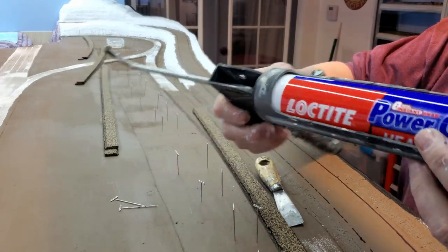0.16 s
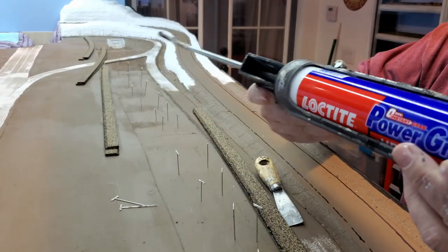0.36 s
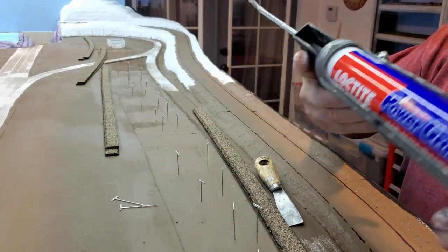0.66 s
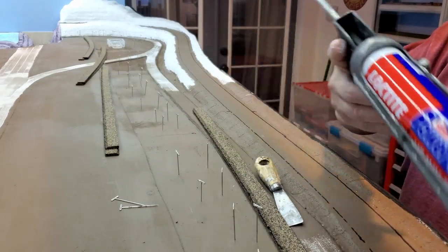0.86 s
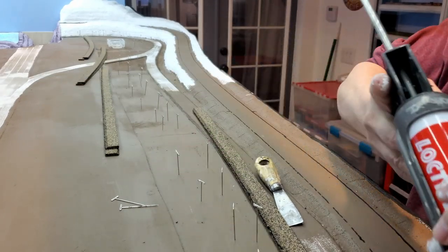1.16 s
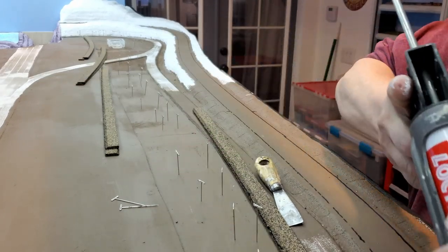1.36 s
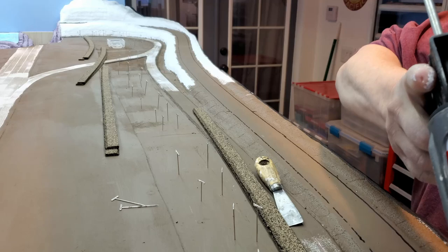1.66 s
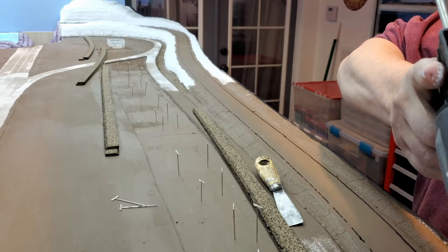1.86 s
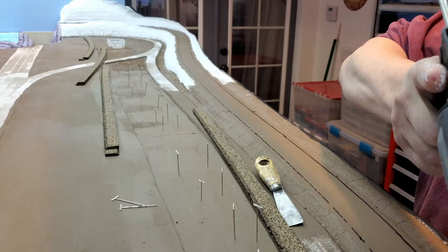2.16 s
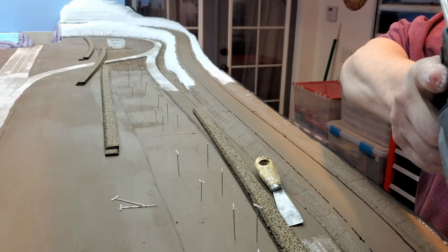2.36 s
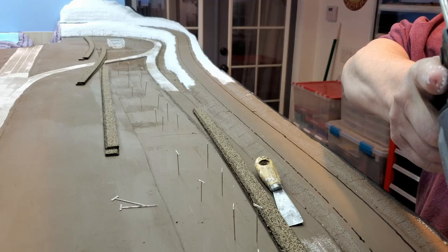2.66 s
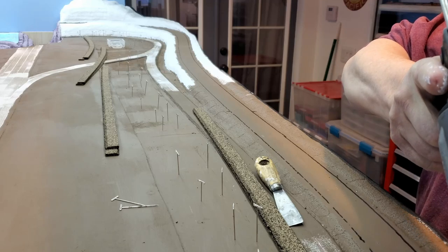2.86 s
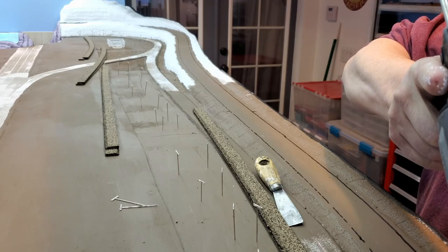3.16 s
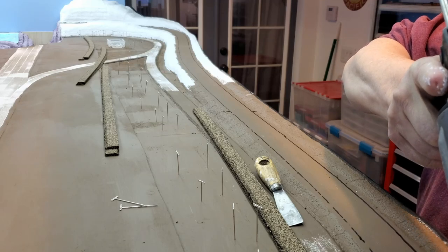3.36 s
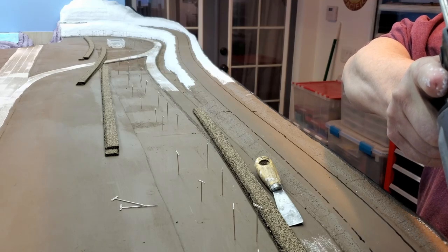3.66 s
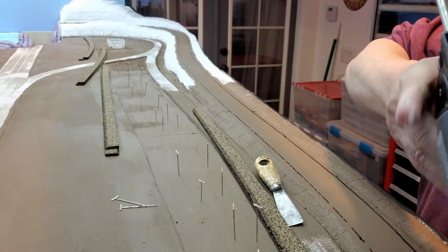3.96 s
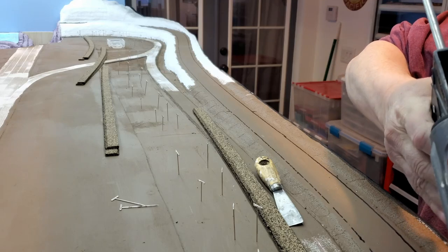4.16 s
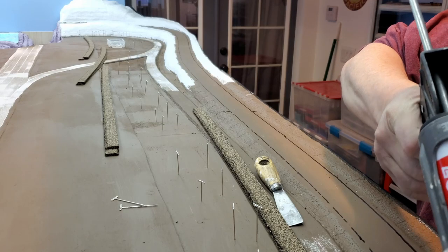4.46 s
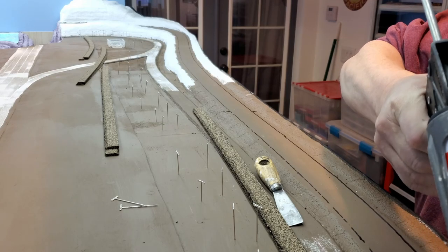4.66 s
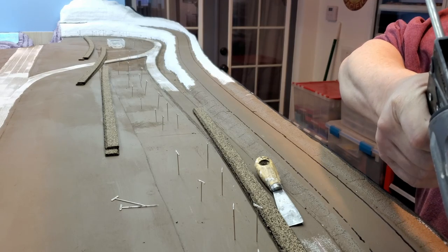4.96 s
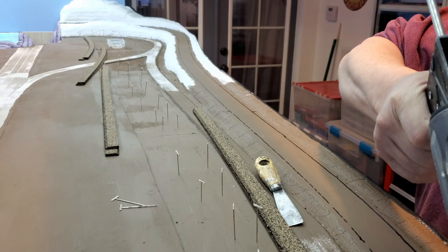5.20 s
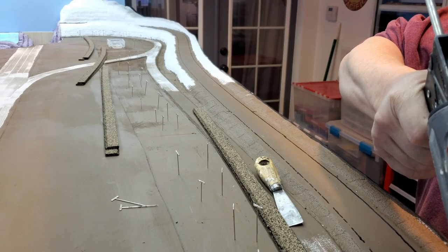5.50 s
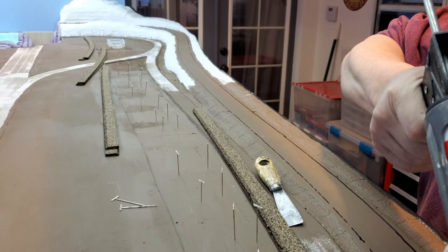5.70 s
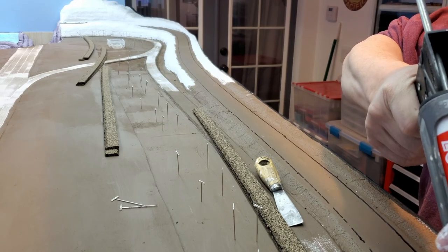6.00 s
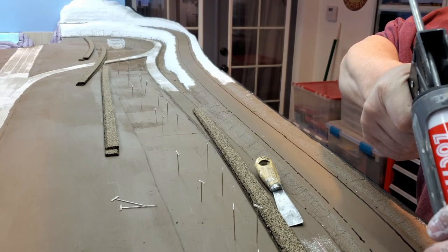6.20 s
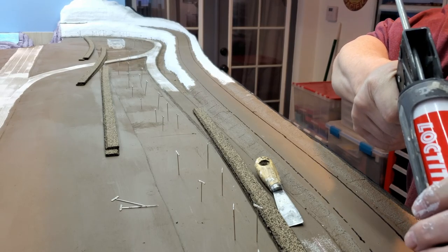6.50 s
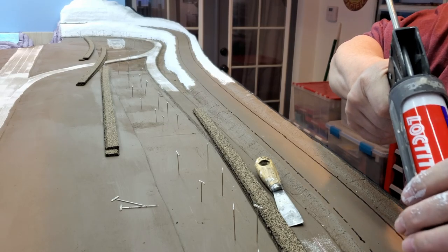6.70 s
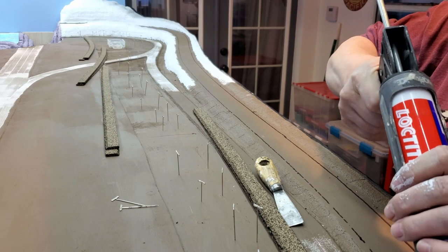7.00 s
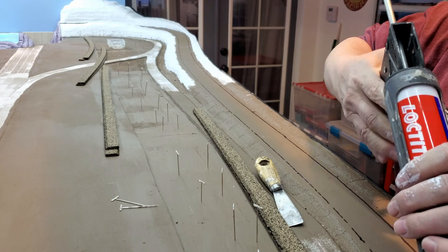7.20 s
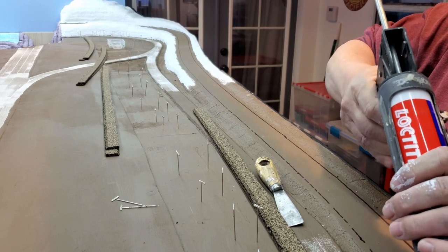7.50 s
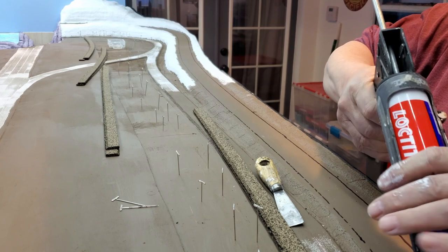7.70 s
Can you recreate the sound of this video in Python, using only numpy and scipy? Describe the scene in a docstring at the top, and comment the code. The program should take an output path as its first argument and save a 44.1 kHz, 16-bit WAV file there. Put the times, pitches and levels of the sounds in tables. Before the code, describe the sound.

Steel rod slides and rattles through a caulking gun, its catch snaps loudly, then ratchety creaks, a hard clack and two more snaps in a small room.

```python
"""A caulking gun is worked over a wooden board in a small workshop, heard close by in stereo.
Its catch plate snaps three times as coloured noise bursts; the loaded rod creaks in short ringing ticks.
The free rod slides and chatters as pulsed noise through steel resonances, with rough narrow squeaks.
Hands rub the tube and loose parts clack, both as filtered noise; the board adds decaying sines and drags.
Beneath lie a low room rumble, faint hiss and a wavering hum."""
import sys
import numpy as np
from scipy import signal
from scipy.fft import rfft, irfft
from scipy.io import wavfile
from scipy.ndimage import uniform_filter1d

SR = 44100
rng = np.random.default_rng(int(sys.argv[2]) if len(sys.argv) > 2 else 0)


def file_out(sig):
    """Save sig as 16-bit WAV at sys.argv[1]."""
    # one column per channel
    cols = np.atleast_2d(sig).T
    # limit, then scale
    lim = np.clip(cols, -1, 1)
    pcm = np.round(lim * 32767).astype(np.int16)
    wavfile.write(sys.argv[1], SR, pcm)


N = 346130
TIME = np.arange(N) / SR
FREQS = np.linspace(1, SR / 2, 2049)  # Hz grid on which every body response is drawn


def amp(db):
    """Decibels to gain."""
    return 10 ** (np.asarray(db) / 20)


def add(track, start_s, sound):
    """Mix a sound into the track from start_s, cut at the end of the track."""
    i = int(start_s * SR)
    track[:, i:i + sound.shape[1]] += sound[:, :N - i]


def loudness(spans):
    """Gain that follows curves of (time_s, level_db) and fades just outside them."""
    gain = 0
    for span in spans:
        time_s, level_db = np.transpose(span)
        edges = [time_s[0] - 0.02, time_s[0], time_s[-1], time_s[-1] + 0.035]
        fade = np.interp(TIME, edges, [0, 1, 1, 0])
        gain = gain + amp(np.interp(TIME, time_s, level_db)) * fade
    return gain


def resonance(hz, width_hz):
    """Power response of one resonance, 1 at its peak."""
    return 1 / (1 + ((FREQS ** 2 - hz ** 2) / (FREQS * width_hz)) ** 2)


def treble(hz):
    """Smooth step over frequency from 0 to 1 around hz, used to shelve a response."""
    return 1 / (1 + (hz / FREQS) ** 6)


def body(points, modes=(), valley_db=0):
    """Response in dB: resonances standing over a broad spectrum shifted by valley_db."""
    hz, level_db = np.transpose(points)
    broad_db = np.interp(np.log(FREQS), np.log(hz), level_db) + valley_db
    ringing = sum(amp(mode_db) ** 2 * resonance(f, width) for f, width, mode_db in modes)
    return 10 * np.log10(amp(broad_db) ** 2 + ringing)


def colour(x, response_db):
    """Causal filter of unit power with the given response; only the shape of the response counts."""
    # folding the cepstrum forward gives minimum phase, so the attack stays sharp
    cepstrum = irfft(np.log(amp(response_db)))
    half = len(cepstrum) // 2
    cepstrum[1:half] *= 2
    cepstrum[half + 1:] = 0
    impulse = irfft(np.exp(rfft(cepstrum)))
    impulse = impulse / np.linalg.norm(impulse)
    return signal.fftconvolve(x, impulse[None], axes=1)[:, :x.shape[1]]


def ports(size, likeness):
    """Noise at two microphone ports; the shared part reaches the right one first."""
    shared, left, right = rng.standard_normal((3, size))
    c = np.clip(likeness, 0, 1)
    together = np.array([np.roll(shared, 7), shared])  # left lags by 7 samples
    apart = np.array([left, right])
    return np.sqrt(c) * together + np.sqrt(1 - c) * apart


def blow(t60, crack_db, crack_t60, bounce_db, likeness):
    """A sharp crack, a dense ring and a bounce; decay times in s, energy of 1 ms of unit noise."""
    t = np.arange(SR // 5) / SR
    late = t - 0.0026  # s since the bounce
    crack = amp(crack_db - 60 * t / crack_t60)
    ring = amp(-60 * t / t60)
    bounce = amp(bounce_db - 60 * np.abs(late) / 0.0017) * (late > 0)
    envelope = (crack + ring + bounce) * (1 - np.exp(-t / 0.0006))
    return ports(len(t), likeness) * envelope / np.sqrt(np.sum(envelope ** 2) * 1000 / SR)


def friction(grain_db, rate, likeness):
    """Dense tiny slips of uneven size in flurries that are redrawn rate times a second."""
    step = int(SR / rate)
    flurry = uniform_filter1d(np.repeat(rng.standard_normal(N // step + 1), step)[:N], step)
    slips = np.repeat(rng.standard_normal(N // 32 + 1), 32)[:N]  # each slip lasts 32 samples
    size = amp(grain_db * (slips + np.tanh(flurry)))
    return ports(N, likeness) * size / np.sqrt(np.mean(size ** 2))


def swell(middle_s, half_length_s):
    """Bell-shaped gain of a stroke that rises and falls around its middle."""
    return np.exp(-2 * ((TIME - middle_s) / half_length_s) ** 2)


def stroke_of(noise, middle_s, half_length_s, response_db):
    """Start time and sound of one stroke of friction on a body."""
    start_s = max(middle_s - 1.5 * half_length_s, 0)
    near = (TIME >= start_s) & (TIME < middle_s + 1.5 * half_length_s)
    stroke = noise[:, near] * swell(middle_s, half_length_s)[near]
    return start_s, colour(stroke, response_db)


def room_tail(t60, treble_t60):
    """Echoes of a small room as decaying noise, unit energy per channel; the treble dies first."""
    t = np.arange(SR // 2) / SR
    noise = rng.standard_normal((2, len(t)))
    low = signal.sosfilt(signal.butter(1, 6000, fs=SR, output="sos"), noise)
    tail = low * amp(-60 * t / t60) + (noise - low) * amp(-60 * t / treble_t60)
    tail = tail * np.clip(t / 0.00037 - 0.5, 0, 1)  # echoes start just after the direct sound
    return tail / np.linalg.norm(tail, axis=1, keepdims=True)


def workshop(x, wet_db):
    """Direct sound plus the room."""
    echoes = signal.fftconvolve(x, room_tail(t60=0.27, treble_t60=0.15), axes=1)[:, :N]
    return x + amp(wet_db) * echoes


def catch_plate():
    """The steel plate scrapes briefly, then lets go of the rod; each snap favours another resonance."""
    # snaps: start_s, level_db, crack_t60_s, favoured_hz, boost_db, scrape_db, room_db, bass_db,
    # pan_db (left minus right)
    snap_events = [(2.4489, -6.5, 0.031, 1700, 0.5, -30.5, -4, -6, 0),
                   (6.884, -9, 0.021, 6700, 5, -34, -2, -2.5, 1),
                   (7.1536, -12.5, 0.0062, 2090, 12, -29, 3.5, 5, 4.5)]
    # plate resonances: pitch_hz, width_hz, level_db
    plate_modes = [(1470, 230, 3.5), (2400, 470, -2.5), (3000, 610, -3), (3800, 210, 2.5), (4960, 150, 3.5),
                   (5530, 180, 1), (7230, 390, 3.5), (7900, 370, -3.5), (9920, 410, 4), (12050, 860, -2.5),
                   (13750, 530, 2.5)]
    # broad plate spectrum: pitch_hz, level_db
    plate_spectrum = [(150, -23.5), (480, -32), (750, 1.5), (950, -26), (1800, -1), (6500, 10.5),
                      (9200, 8.5), (15000, 6), (16500, -3.5)]
    tail_gain_db = 16  # energy that the room gathers from a snap
    out = np.zeros((2, N))
    steel = body(plate_spectrum, plate_modes, valley_db=-7.5)
    lead = np.arange(-SR // 25, 0) / SR  # s before the snap
    for start_s, db, crack_t60, hz, boost_db, scrape_db, room_db, bass_db, pan_db in snap_events:
        favoured = boost_db * resonance(hz, hz / (2 * np.pi))
        response = steel + favoured + bass_db * (1 - treble(1000))
        scrape = amp(scrape_db) * np.exp(lead / 0.006) * ports(len(lead), 0.3)
        add(out, start_s + lead[0], colour(scrape, response + 6 * resonance(6500, 3000)))
        crack = blow(t60=0.054, crack_db=12.0, crack_t60=crack_t60, bounce_db=-5.5, likeness=0.6)
        sides_db = np.array([[pan_db], [-pan_db]]) / 2
        add(out, start_s, amp(db + sides_db) * colour(crack, response))
        # the room gathers the snap from all directions, so its tail is an even noise
        tail = colour(room_tail(t60=0.31, treble_t60=0.21), response)
        add(out, start_s, amp(db + room_db + tail_gain_db) * tail)
    return out


def creak():
    """Under load the rod slips in sharp ticks, each of its own colour, and grinds on a hard trigger."""
    # single slips: start_s, level_db, body_db (low and middle shelf)
    ticks = [(4.454, -34, -12), (4.512, -34, -15), (4.57, -31, 1.5), (2.5259, -24.5, 6), (2.603, -26.5, 8),
             (2.638, -33.5, -2), (2.669, -28, 4), (2.7123, -29, 6), (2.7567, -34.5, -6), (2.776, -28, 2.5),
             (2.8061, -34.5, -8), (2.8196, -31.5, 3), (2.8811, -31.5, 0.5), (2.9461, -25.5, 3.5),
             (2.9792, -34, 8), (2.9938, -33.5, 7), (3.0702, -29.5, -4), (3.09, -27.5, -5), (3.104, -30, 3),
             (3.1177, -25.5, 10.5), (3.175, -30, 8.5), (3.2074, -26, 3.5), (3.2292, -31.5, -1),
             (3.286, -26, 2.5), (3.3, -34.5, -8), (3.3333, -28, -2), (3.3772, -23.5, 4), (3.398, -33, 7),
             (3.4363, -28, 0), (3.4482, -29.5, -10), (3.486, -27.5, 6.5), (3.505, -28.5, -4),
             (3.523, -30, -3), (3.541, -29.5, -7), (3.599, -30, 2.5), (3.632, -29.5, -5), (3.66, -34, -4),
             (3.6822, -33, -8), (5.003, -31.5, -5), (5.0177, -29, 1), (5.0353, -26, 13.5),
             (5.0584, -27.5, 9), (5.093, -30, 1), (5.1033, -36, -9), (5.1194, -28, -1), (5.13, -33.5, -3),
             (5.1884, -29.5, 8), (5.2375, -29.5, -5), (5.2559, -29, -10), (5.2883, -28.5, -4.5),
             (5.322, -26.5, 8.5), (5.3817, -32, -2), (5.406, -32.5, -6), (5.4335, -28, -1),
             (5.4451, -30.5, -6), (5.4749, -28, 2), (5.4841, -32, -4), (5.5668, -26, -4.5),
             (5.7223, -30, -13), (5.747, -27, -0.5), (5.829, -28, -8.5), (5.842, -30.5, -9),
             (5.863, -35.5, -11), (5.8897, -30.5, -6), (6.01, -31.5, -3), (6.1107, -32.5, -10),
             (6.2194, -29, -12), (6.3026, -33.5, -22), (6.724, -42.5, -12), (6.796, -41.5, -20)]
    # grinding while the trigger is held hard, one curve per squeeze: time_s, level_db
    squeezes = [
        [(2.55, -47.5), (2.75, -56.5), (2.85, -74)],
        [(4.94, -50), (5.03, -40), (5.11, -45)],
        [(5.65, -61), (6.0, -60.5), (6.22, -50.5), (6.4, -54), (6.85, -64)],
    ]
    # resonances of the loaded gun: pitch_hz, width_hz, level_db
    loaded_modes = [(1486, 22.3, -2), (2274, 8.4, -4), (3090, 170, 0.5), (4294, 29, -3), (4666, 110, -3),
                    (5250, 1050, -3.5), (6220, 137, 0.5), (7570, 450, -11.5), (8350, 46, -10.5)]
    # broad spectrum of the loaded gun: pitch_hz, level_db
    loaded_spectrum = [(500, -68), (800, -38), (1300, -54), (2300, 3.5), (4000, -8), (6500, -4.5),
                       (7600, -29.5), (10000, -21.5), (16000, -28)]
    detune_widths = 1.2  # the contact point moves, and each resonance with it, in units of its width
    colour_spread_db = 3  # each slip rings the resonances in other proportions
    out = np.zeros((2, N))
    for start_s, db, body_db in ticks:
        chance = rng.standard_normal((len(loaded_modes), 2))
        modes = [(hz + detune_widths * width * shift, width, mode_db + colour_spread_db * weight)
                 for (hz, width, mode_db), (shift, weight) in zip(loaded_modes, chance)]
        # a heavier push reaches the low resonances of the tube
        response = body(loaded_spectrum, modes, valley_db=-8.0) + body_db * (1 - treble(3270))
        slip = blow(t60=0.06, crack_db=14, crack_t60=0.008, bounce_db=8, likeness=0.5)
        add(out, start_s, amp(db) * colour(slip, response))
    gun = body(loaded_spectrum, loaded_modes, valley_db=-6.0)
    gun = gun + 4 * resonance(4040, 490) + 3 * treble(6400)
    grind = friction(grain_db=3.5, rate=60, likeness=0.15)
    out += loudness(squeezes) * colour(grind, gun)
    return workshop(out, wet_db=-6.5)


def rod():
    """The free rod buzzes through its guide in regular slips, then catches ever harder on the way."""
    # strokes: guide_hz, boost_db, then a curve of time_s, level_db, slips_per_s
    slide_strokes = [(2850, 6.5, [(1.4, -50, 140), (1.44, -55, 125), (1.48, -40, 158), (1.56, -44.5, 130)]),
                     (5400, 5, [(1.6, -44.5, 73), (1.9, -41.5, 61), (2.3, -41.5, 67), (2.44, -50, 59)]),
                     (6200, 4.5, [(4.39, -38, 105), (4.47, -39, 89), (4.54, -41, 45)]),
                     (3740, 13, [(7.48, -46, 124), (7.585, -43.5, 127), (7.64, -47, 58), (7.73, -49.5, 42),
                     (7.85, -44, 66)])]
    # catching in the guide: time_s, catches_per_s
    chatter = [(1.559, 32.3), (1.641, 18.6), (1.725, 31.2), (1.938, 38.1), (2.07, 24.7), (2.074, 48.7),
               (2.158, 21.1), (2.289, 48.6), (2.365, 23), (2.44, 36)]
    # rod resonances: pitch_hz, width_hz, level_db
    rod_modes = [(1935, 33, -5.5), (2356, 70, 0), (2864, 74, 1.5), (3760, 190, -5), (4625, 130, -3),
                 (7700, 240, -13.5)]
    # broad rod spectrum: pitch_hz, level_db
    rod_spectrum = [(800, -50.5), (1300, -11.5), (2500, -3.5), (4800, -3), (7500, -9), (9000, -18),
                    (16000, -20)]
    slip_t60, between_db = 0.013, -19  # s; smooth sliding that stays between slips
    chatter_db, rise_db_per_s = -37, 6
    out = np.zeros((2, N))
    steel = body(rod_spectrum, rod_modes, valley_db=-4.5)
    for guide_hz, guide_db, stroke in slide_strokes:
        time_s, level_db, rate = np.transpose(stroke)
        rate = np.interp(TIME, time_s, rate)
        since_slip = np.cumsum(rate) / SR % 1 / rate  # s
        slips = amp(-60 * since_slip / slip_t60) + amp(between_db)
        scrape = loudness([np.c_[time_s, level_db]]) * slips * ports(N, 0.3)
        out += colour(scrape, steel + guide_db * resonance(guide_hz, 1090))

    catches = np.zeros((2, N))
    time_s, rate = np.transpose(chatter)
    t = np.arange(time_s[0], time_s[-1], 1 / SR)
    cycles = np.cumsum(np.interp(t, time_s, rate)) / SR
    # a lighter contact joins every catch after the first: first cycle, level in dB
    for first_cycle, layer_db in ((0, 0), (1, -13.5)):
        for at in np.interp(np.arange(first_cycle, cycles[-1]), cycles, t):
            contact = blow(t60=0.028, crack_db=3, crack_t60=0.007, bounce_db=0, likeness=0.45)
            level_db = chatter_db + rise_db_per_s * (at - time_s[0]) + layer_db
            add(catches, at, amp(level_db) * contact)
    struck_steel = body(rod_spectrum, rod_modes, valley_db=-13) + 4 * treble(4450)
    return workshop(out + colour(catches, struck_steel), wet_db=-8.5)


def squeaks():
    """Uneven slips ring narrow resonances whose pitch moves with the load."""
    # rough tones from rod squeaks to a low drone: width_hz, then a curve of time_s, pitch_hz, level_db
    squeak_notes = [(70.4, [(1.48, 1115, -63.5), (1.62, 1147, -66), (1.72, 1187, -69.5), (1.92, 1216, -64),
                    (2.3, 1221, -61.5), (2.41, 1210, -72)]), (355, [(2.62, 2468, -44), (2.67, 2358, -48),
                    (2.72, 2350, -49), (2.81, 2240, -57)]), (70, [(3.765, 743, -64), (3.795, 778, -62),
                    (3.85, 890, -78)]), (447, [(7.2, 2206, -44), (7.3, 2000, -61)]),
                    (60, [(7.49, 1176, -68), (7.75, 1144, -74.5)]), (30.2, [(4.35, 192, -64.5),
                    (5.47, 187.7, -62)])]
    evenness = 0.45  # the slips lock to the resonance, which evens out its level
    out = np.zeros((2, N))
    for width_hz, note in squeak_notes:
        time_s, hz, level_db = np.transpose(note)
        slips = friction(grain_db=4.5, rate=65, likeness=0.88)
        scattered = slips * np.exp(2j * np.pi * rng.random(N))
        # narrow complex noise, moved up to the gliding pitch
        waver = signal.sosfilt(signal.butter(2, width_hz / 2, fs=SR, output="sos"), scattered)
        carrier = np.exp(2j * np.pi * np.cumsum(np.interp(TIME, time_s, hz)) / SR)
        tone = np.real(waver / np.abs(waver) ** evenness * carrier)
        out += loudness([np.c_[time_s, level_db]]) * tone / tone.std()
    return workshop(out, wet_db=-3.5)


def handling():
    """Hands and sleeve rub the gun as swelling friction; trigger and frame clack in their play."""
    # rubs: middle_s, half_length_s, level_db, main_hz, treble_db
    rubs = [(0.211, 0.013, -42.5, 2530, -19), (0.233, 0.096, -56, 2300, 5), (0.402, 0.052, -52, 2530, 3.5),
            (0.61, 0.17, -63.5, 770, 6.5), (1.075, 0.046, -57, 4020, 7.5), (1.192, 0.07, -59.5, 2230, 6),
            (3.89, 0.087, -41, 1840, -1), (4.148, 0.039, -61, 2430, -12.5), (4.39, 0.085, -45.5, 2090, -3),
            (7.119, 0.049, -38.5, 7670, -0.5), (7.461, 0.036, -53.5, 6950, 10),
            (7.825, 0.5, -56.5, 1970, 6)]
    # clacks of loose parts: start_s, level_db, main_hz, treble_db
    clacks = [(.027, -42.5, 2730, 8), (0.531, -39, 4000, 17), (.538, -43.5, 825, -10),
              (0.693, -36.5, 3760, 13), (.7225, -45.5, 1800, -9), (.724, -49, 760, -18),
              (3.732, -39, 1400, -32), (3.752, -39, 315, -34), (3.859, -27.5, 12400, 24),
              (3.9393, -18.5, 2280, 1.5), (4.359, -28, 746, 3), (4.383, -29, 2400, 1),
              (4.646, -43.5, 8870, 10.5), (4.716, -40, 9720, 11.5), (4.821, -42, 3040, 10),
              (7.098, -25.5, 12600, 24.5), (7.475, -41, 2500, 7), (7.635, -46, 730, 11)]
    # broad spectrum of a rub: pitch_hz, level_db
    skin_spectrum = [(300, -9), (700, 3), (1000, -11.5), (1600, -9.5), (2400, -2.5), (3200, -2.5),
                     (5000, -6.5), (8000, -13), (16000, -19.5)]
    # broad frame spectrum: pitch_hz, level_db
    frame_spectrum = [(150, -7), (480, -55), (900, -5), (2400, -7.5), (5000, -7), (16000, -26)]
    # frame resonances: pitch_hz, width_hz, level_db
    frame_modes = [(315, 30, 8.5), (729, 83, 2), (1490, 230, 1.5), (2530, 100, 6)]
    out = np.zeros((2, N))
    frame = body(frame_spectrum, frame_modes)
    skin = friction(grain_db=4, rate=150, likeness=0.1)
    for middle_s, half_length_s, db, hz, treble_db in rubs:
        response = body(skin_spectrum) + 7.5 * resonance(hz, 0.24 * hz) + treble_db * treble(5400)
        response = response - 17.5 * (1 - treble(860))  # a light touch hardly moves the low resonances
        add(out, *stroke_of(amp(db) * skin, middle_s, half_length_s, response))
    for start_s, db, hz, treble_db in clacks:
        # the part that is hit stands out
        response = frame + 14 * resonance(hz, 0.22 * hz) + treble_db * treble(3800)
        hit = blow(t60=0.046, crack_db=-9, crack_t60=0.0051, bounce_db=-13.0, likeness=0.48)
        add(out, start_s, amp(db) * colour(hit, response))
    return workshop(out, wet_db=-6.0)


def board():
    """The board booms as decaying sines when pushed, and murmurs as the gun drags along it."""
    # short drags: middle_s, half_length_s, level_db, main_hz
    pulls = [(5.729, 0.1, -61.5, 775), (6.074, 0.16, -60.5, 760), (6.198, 0.028, -55.5, 710),
             (6.238, 0.04, -52, 546), (6.355, 0.1, -55, 506), (6.516, 0.094, -52, 530),
             (6.59, .035, -53, 310), (6.658, 0.097, -55.5, 720), (6.7, 0.18, -58, 513),
             (6.834, 0.3, -57, 762)]
    # booms: start_s, level_db, pitch_hz, t60_s, knock_db
    booms = [(3.945, -25, 69, 0.19, -44), (3.958, -41, 68.2, 1, -53), (4.361, -39, 67.7, 1, -37),
             (5.385, -40, 53.6, 0.29, -68), (7.475, -38.5, 68.5, 0.5, -84)]
    # broad board spectrum: pitch_hz, level_db
    wood_spectrum = [(120, -25), (290, 5.5), (420, 0), (520, 4), (800, 2), (950, -4.5), (1150, -2),
                     (3000, -13), (6500, -12.5), (9000, -33), (16000, -15.5)]
    wood = body(wood_spectrum)
    out = np.zeros((2, N))
    drag = friction(grain_db=2.0, rate=26, likeness=0.46)
    for middle_s, half_length_s, db, hz in pulls:
        response = wood + 11 * resonance(hz, 90)
        add(out, *stroke_of(amp(db) * drag, middle_s, half_length_s, response))
    out = workshop(out, wet_db=-1.5)
    t = np.arange(SR) / SR
    for start_s, db, hz, t60, knock_db in booms:
        add(out, start_s, amp(knock_db) * knock())
        envelope = amp(db - 60 * t / t60) * (1 - np.exp(-t / 0.011))
        add(out, start_s, (envelope * np.sin(2 * np.pi * hz * t))[None])
    return out


def knock():
    """A dull blow on the board: a few wooden modes ring briefly."""
    # modes of the knocked board: pitch_hz, t60_s, level_db
    wood_modes = [(666, 0.067, -3), (767, 0.095, 5), (804, 0.012, -11), (1500, .03, -8)]
    lag_s = np.array([[0.00027], [0]])  # the knock reaches the right port first
    t = np.maximum(np.arange(SR // 4) / SR - lag_s, 0)
    ring = sum(amp(db - 60 * t / t60) * np.sin(2 * np.pi * hz * t) for hz, t60, db in wood_modes)
    return ring * (1 - np.exp(-t / 0.001))  # wood gives way softly


def room_tone():
    """Rumble nearly alike at both ports, faint mostly unrelated hiss and a wavering hum."""
    # broad room spectrum: pitch_hz, level_db
    room_spectrum = [(25, -19.5), (45, -9.5), (80, -1), (125, -10.5), (210, -11), (320, -22), (500, -31),
                     (900, -31), (2300, -29), (7000, -36), (9500, -43), (16000, -41.5)]
    # low hum: time_s, pitch_hz, level_db
    hum_curve = [(0, 88.56, -59), (2.3, 90.2, -57), (2.602, 80.4, -63), (7.85, 83, -63)]
    air = body(room_spectrum)
    rumble = amp(-59.0) * colour(ports(N, 0.9), air - 30 * treble(420))
    hiss = amp(-67.8) * colour(ports(N, 0.03), air - 25 * (1 - treble(161)))
    time_s, hz, level_db = np.transpose(hum_curve)
    waver = np.interp(TIME, np.linspace(0, TIME[-1], 80), rng.standard_normal(80))
    phase = 2 * np.pi * np.cumsum(np.interp(TIME, time_s, hz)) / SR
    hum = amp(np.interp(TIME, time_s, level_db) + 1.2 * waver) * np.sin(phase)
    return rumble + hiss + hum


def scene():
    """All sources together."""
    return catch_plate() + creak() + rod() + squeaks() + handling() + board() + room_tone()


def record(dry):
    """The microphone pair widens the low mids, rounds the highest peaks and cuts the top."""
    # stereo image: pitch_hz, side_gain_db, pan_db (left minus right)
    stereo_image = [(130, -3.5, 0.5), (400, 3, -1), (720, 4, -2.5), (1350, 5, 1), (2400, 0, -0.5)]
    hz, side_db, pan_db = np.transpose(stereo_image)
    log_hz = np.log(np.arange(N // 2 + 1) * SR / N + 1)
    mid = rfft(dry[0] + dry[1]) / 2
    side = rfft(dry[0] - dry[1]) / 2 * amp(np.interp(log_hz, np.log(hz), side_db))
    lean = amp(np.interp(log_hz, np.log(hz), pan_db) / 2)
    wide = irfft(np.array([(mid + side) * lean, (mid - side) / lean]), N)
    rounded = 0.6 * np.tanh(wide / 0.6)
    top_cut = signal.ellip(10, 0.2, 70, 15900, fs=SR, output="sos")  # steep low-pass at 15.9 kHz
    return signal.sosfilt(top_cut, rounded)


dry = scene()
out = record(dry)
file_out(out)
```